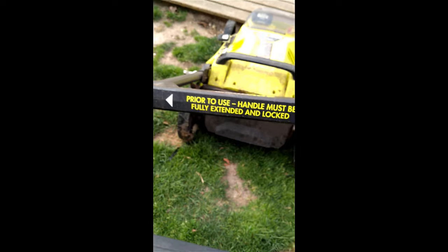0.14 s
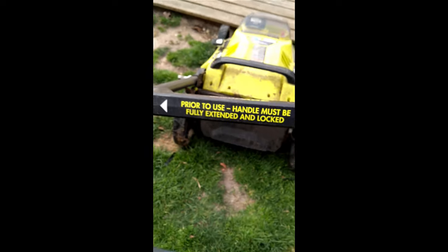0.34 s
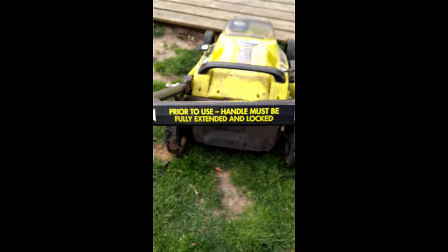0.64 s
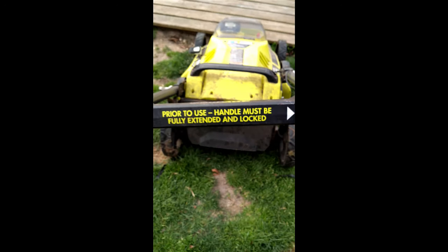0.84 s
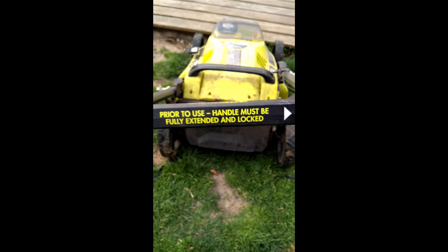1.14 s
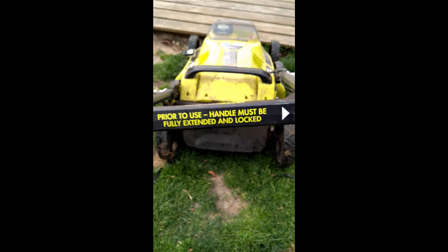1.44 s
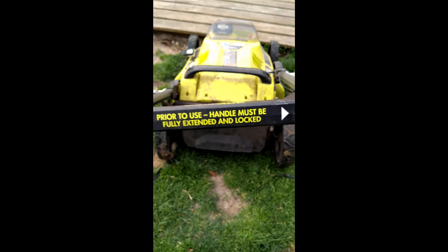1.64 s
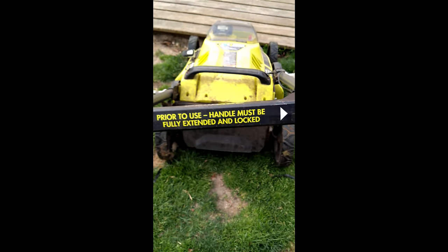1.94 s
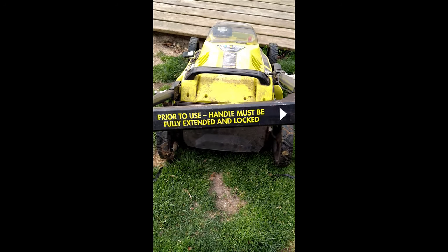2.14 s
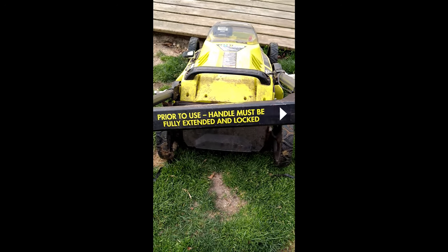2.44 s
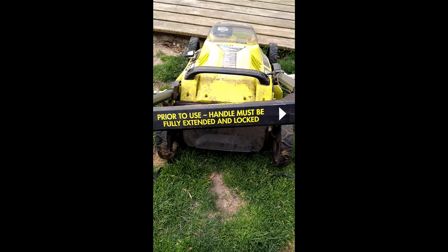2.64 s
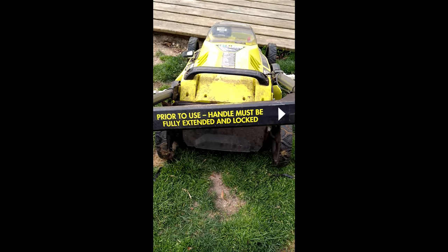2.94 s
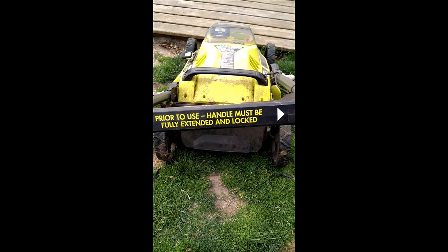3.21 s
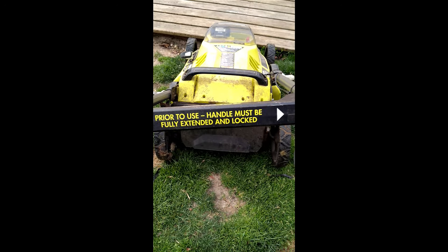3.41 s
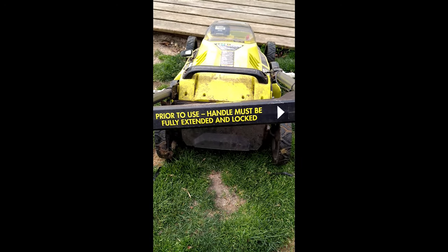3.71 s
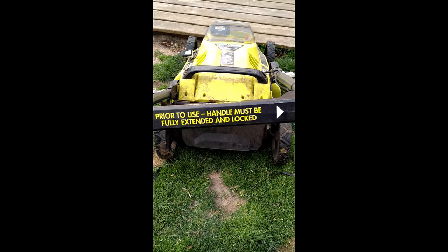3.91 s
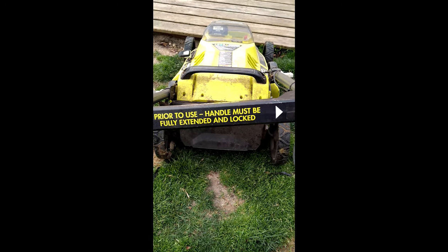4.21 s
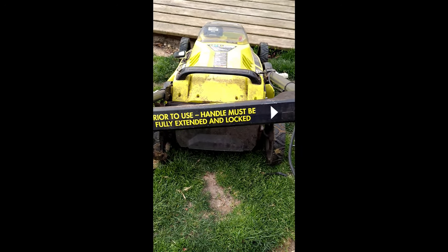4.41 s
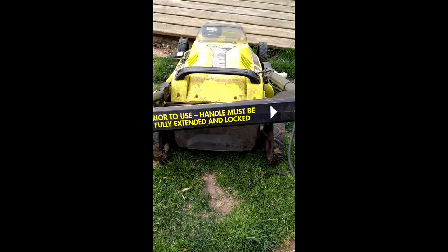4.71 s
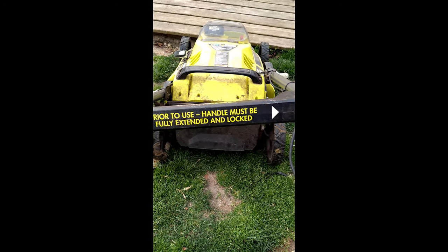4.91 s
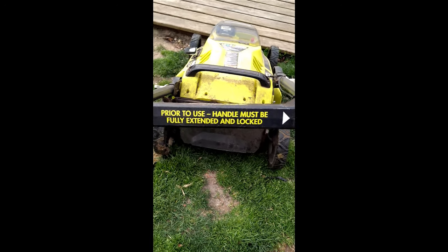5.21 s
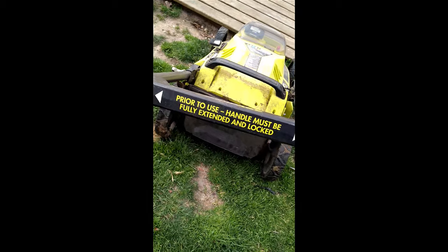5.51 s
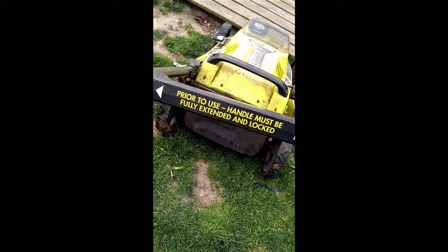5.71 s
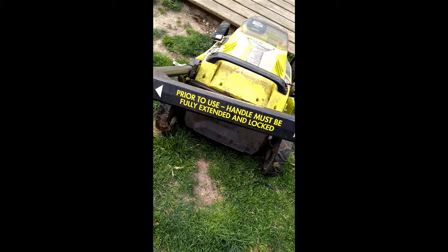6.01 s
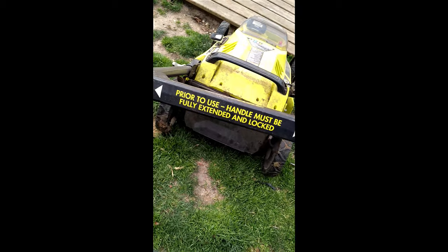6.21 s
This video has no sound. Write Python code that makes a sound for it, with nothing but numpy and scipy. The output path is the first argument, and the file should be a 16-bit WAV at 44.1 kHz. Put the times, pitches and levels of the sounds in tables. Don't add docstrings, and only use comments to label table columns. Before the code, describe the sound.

A battery-powered mower runs in place on a lawn about a metre from a handheld stereo phone. Its motor climbs, briefly overshoots and settles within two seconds. A rapid low blade throb, hollow midrange deck roar and pulsing tip hiss continue throughout, with irregular air slaps and tiny grit ticks. Near five seconds, the hiss softens as the phone turns aside.

```python
import sys
import numpy as np
from scipy import signal
from scipy.fft import rfft, irfft
from scipy.io import wavfile

SR = 44100
rng = np.random.default_rng(int(sys.argv[2]) if len(sys.argv) > 2 else 0)


def rack_gain(trim_db):
    fader = np.asarray(trim_db, float)
    return 10 ** (fader / 20)


def output_pcm(signal):
    pcm = np.clip(np.atleast_2d(signal).T, -1, 1) * 32767
    wavfile.write(sys.argv[1], SR, np.round(pcm).astype(np.int16))


N = 280035
TIME = np.arange(N) / SR
BIN_HZ = np.maximum(np.arange(N // 2 + 1) * SR / N, 1)
HOLD_HZ = 42.618
PORT_LAG_MS = .468


def across(table, column=1):
    rows = np.array(table)
    return np.interp(np.log(BIN_HZ), np.log(rows[:, 0]), rows[:, column])


def walk(place, spread_db):
    steps = rng.standard_normal(4000)
    k = np.floor(place).astype(int) % 3999
    ease = (1 - np.cos(np.pi * (place % 1))) / 2
    return rack_gain(spread_db * (steps[k] * (1.5 - ease) + steps[k + 1] * ease))


# frequency in Hz, right level against left in dB, likeness of the two from 0 to 1.
RIGHT_PORT = [(30, -4, .25), (110, -2.5, .25), (160, -2.5, .75), (260, -4.5, .62), (420, -4, .5),
              (600, -.3, .92), (1050, -.9, .988), (1600, -3, .92), (2900, -3, .86), (4500, -1.5, .8),
              (5400, -.5, .92), (6500, -.6, .85), (8000, -6, .45), (10500, -12, .15)]


def air(gate, colour, lag_ms=0., sign=1):
    gate = gate * np.sqrt(SR / 2 / np.mean(gate ** 2))
    shared, other = rfft(rng.standard_normal((2, N)) * gate)
    like = np.clip(across(RIGHT_PORT, column=2), 0, 1)
    late = sign * np.exp(-2j * np.pi * BIN_HZ * lag_ms / 1000)
    mixed = like * late * shared + np.sqrt(1 - like ** 2) * other
    right = rack_gain(across(RIGHT_PORT)) * mixed
    return irfft(rack_gain(across(colour)) * np.array([shared, right]), N)


def shaft():
    swing = -4.217 * np.exp(-TIME / .322) * np.cos(2 * np.pi * .554 * TIME + .264)
    surplus = 1.361 * np.exp(-TIME / .592)
    return HOLD_HZ + swing + surplus


# multiple of the shaft rate, left level in dB, right level in dB, right port's lead in radians.
THUMP_TONES = [(1, -49.0, -50.6, -2.4), (2, -30.3, -56.1, 1.7), (3, -42.1, -41.3, 0.5),
               (4, -25.2, -29.1, 0.3), (5, -33.2, -39.9, 0.3), (6, -22.8, -32.4, -0.1),
               (7, -39.9, -41.6, 0.2), (8, -29.4, -35.0, 1.1), (9, -45.2, -48.7, 1.0),
               (10, -30.6, -38.8, 0.8), (11, -44.0, -44.0, 1.4), (12, -36.9, -35.1, 0.0),
               (13, -44.3, -45.5, -0.1), (14, -42.0, -40.5, 0.3), (15, -54.8, -51.6, -0.2),
               (16, -37.5, -40.8, -0.2)]


def thump(turn):
    out = np.zeros((2, N))
    for k, left_db, right_db, lead in THUMP_TONES:
        shape = np.pi * (k < 8.5) + .4 - 4.5 / k ** 2
        uneven = 1.4 * (k % 2)
        jitter = np.log(walk(TIME * 15, spread_db=.35 * k))
        phase = 2 * np.pi * k * turn + shape + uneven + jitter
        sway = np.sqrt(2) * walk(TIME * 7.0, spread_db=.5)
        left = rack_gain(left_db) * np.cos(phase)
        right = rack_gain(right_db) * np.cos(phase + lead)
        out += sway * np.array([left, right])
    return out


# frequency in Hz, level in dB per Hz.
ROAR_COLOUR = [(150, -110), (300, -96), (550, -62.5), (800, -50), (950, -45), (1080, -44), (1250, -46.5),
               (1450, -57.5), (1800, -69.5), (2500, -99), (4000, -125)]


def roar(tip):
    beat = rack_gain(2.4 * np.cos(tip - .3) + 1.4 * np.cos(2 * tip + .2))
    sizes = walk(tip / np.pi, spread_db=.6) * walk(TIME * 9.0, spread_db=.3)
    return air(beat * sizes, ROAR_COLOUR)


# time the gust sets in, in seconds (its ring peaks about 2 ms
# later), peak level in dB, ring frequency in Hz.
HARD_GUSTS = [(0.097, -8, 945), (0.146, -8, 1030), (0.47, -5, 1060), (0.7, -8, 1070), (0.733, -6, 999),
              (1.141, -7, 961), (1.761, -7, 1050), (1.984, -6, 966), (2.019, -8, 966), (2.955, -8, 931),
              (3.017, -9, 1150), (3.673, -9, 1080), (3.695, -10, 1170), (3.719, -7, 1120),
              (4.048, -4, 1070), (4.306, -6, 1010), (4.353, -7, 993), (4.482, -9, 961), (4.545, -7, 1150),
              (4.974, -6, 1100), (5.351, -8, 977), (5.69, -7, 1070), (5.866, -4, 937), (6.02, -6, 1060)]


def slaps():
    out, lull = np.zeros(N), np.ones(N)
    half = 400
    t = TIME[:2 * half] - half / SR
    for start, db, hz in HARD_GUSTS:
        i = int(start * SR) - half
        swell = np.exp(-((t - .0018) / .0015) ** 2)
        out[i:i + 2 * half] += rack_gain(db) * np.sin(2 * np.pi * hz * t) * swell
        lull[i:i + 2 * half] *= 1 - .95 * np.exp(-((t + .002) / .0045) ** 2)
    return np.array([out, rack_gain(-.8) * out]), lull


# frequency in Hz, level in dB per Hz.
RUMBLE_COLOUR = [(18, -71), (30, -78), (60, -66), (110, -65.5), (150, -56.5), (240, -54), (400, -53.5),
                 (600, -54.5), (800, -62), (1300, -81), (2500, -125)]


def rumble(tip):
    beat = rack_gain(1.8 * np.cos(tip + 0.27))
    sizes = walk(tip / np.pi, spread_db=-0.8) * walk(TIME * 12, spread_db=0.6)
    return air(beat * sizes, RUMBLE_COLOUR)


# frequency in Hz, level in dB per Hz.
HISS_COLOUR = [(700, -100), (1400, -55.5), (1900, -61), (2200, -67), (2450, -61), (2650, -68.5),
               (2900, -65), (3300, -73.5), (3700, -75.5), (4500, -100), (6000, -125)]
FIZZ_COLOUR = [(2200, -120), (3000, -92.5), (3600, -77), (3900, -72.5), (4500, -82), (5400, -81.5),
               (6000, -88.5), (7200, -88.5), (10000, -110), (14000, -125)]


def tip_hiss(tip):
    out = np.zeros((2, N))
    for colour, late, scatter_db in [(HISS_COLOUR, 3.03, 0.9), (FIZZ_COLOUR, 2.7, 1.0)]:
        beat = rack_gain(2.3 * np.cos(tip + late) + .8 * np.cos(2 * (tip + late)))
        sizes = walk(tip / np.pi * 1.5, scatter_db) * walk(TIME * 14, spread_db=.4)
        out += air(beat * sizes, colour, lag_ms=PORT_LAG_MS, sign=-1)
    return out


# frequency in Hz, level in dB per Hz.
TOP_COLOUR = [(4000, -125), (6200, -100), (7200, -106), (8000, -90), (9000, -90.5), (10500, -92.5),
              (11500, -95.5), (12300, -103), (13500, -107), (16000, -120)]


def top_air(tip):
    gate = rack_gain(.5 * np.cos(tip + 1.7)) * walk(TIME * 160, spread_db=0.7)
    return air(gate, TOP_COLOUR, lag_ms=PORT_LAG_MS, sign=-1)


# time in seconds, peak level in dB.
GRIT_FLICKS = [
    (.043, -46),
    (1.603, -39),
    (1.609, -35),
    (2.24, -42),
    (3.3, -46),
    (3.879, -45),
    (3.916, -41),
    (5.639, -47),
]


def grit():
    width_ms = 3
    shape = np.zeros(N)
    for start, db in GRIT_FLICKS:
        shape += rack_gain(db) * np.exp(-(1000 * (TIME - start) / width_ms) ** 2)
    bright = signal.butter(2, [7500, 13500], "bandpass", fs=SR, output="sos")
    scratches = signal.sosfilt(bright, shape * rng.standard_normal((2, N)))
    return scratches * rack_gain(np.array([[0.], [-7.]]))


# time in seconds, share from 0 to 1.
PHONE_TURN = [
    (4.8, 0),
    (5.5, 1),
    (6.1, 1),
    (6.35, .4),
]


def phone_aside():
    return np.interp(TIME, *np.transpose(PHONE_TURN))


def scene():
    shaft_hz, aside = shaft(), phone_aside()

    def gain(db, per_hz_db, aside_db):
        return rack_gain(db + per_hz_db * (shaft_hz - HOLD_HZ) + aside_db * aside)

    turn = .512 + np.cumsum(shaft_hz) / SR
    tip = 4 * np.pi * turn
    blows, lull = slaps()
    blade = gain(1.23, 0.83, -0.32) * thump(turn)
    deck = gain(-0.4, 0.4, 0.32) * (lull * roar(tip) + rumble(tip)) + blows
    tips = gain(0.82, 0.66, -0.89) * tip_hiss(tip)
    fine = gain(1.8, .6, -2.9) * top_air(tip)
    return blade + deck + tips + fine + grit()


def roll_off(x):
    return signal.sosfilt(signal.butter(12, 14320, fs=SR, output="sos"), x)


def record(dry):
    mix = np.tanh(.7 * dry) / .7
    return roll_off(mix)


dry = scene()
out = record(dry)
output_pcm(out)
```